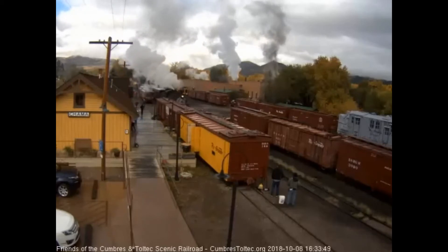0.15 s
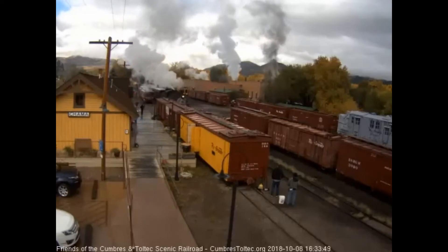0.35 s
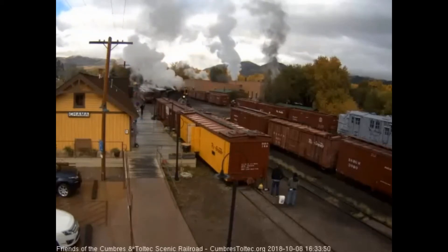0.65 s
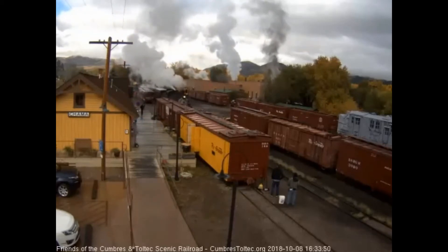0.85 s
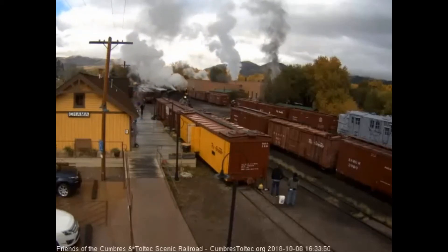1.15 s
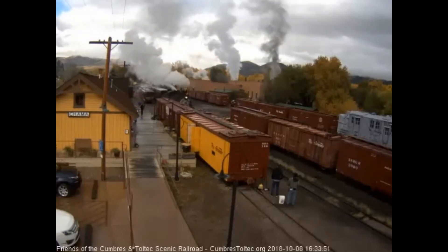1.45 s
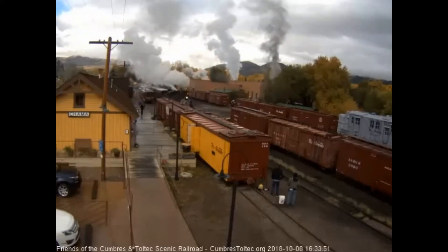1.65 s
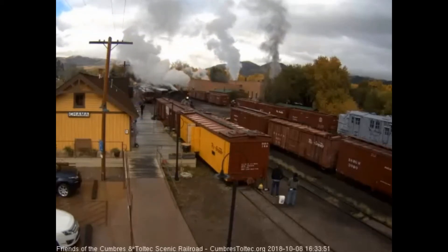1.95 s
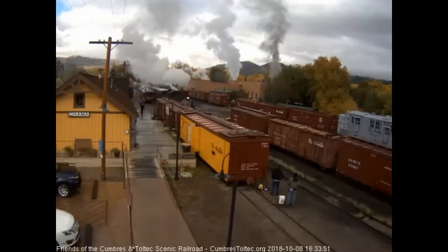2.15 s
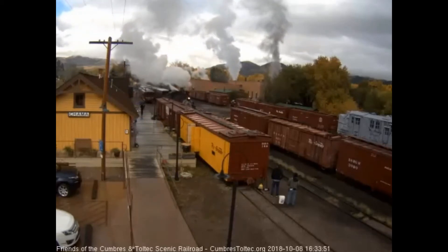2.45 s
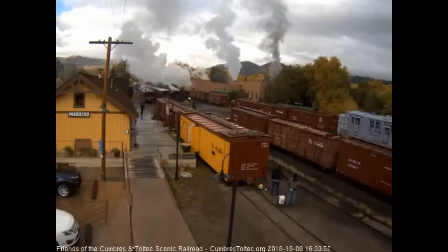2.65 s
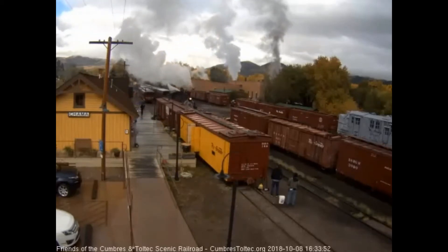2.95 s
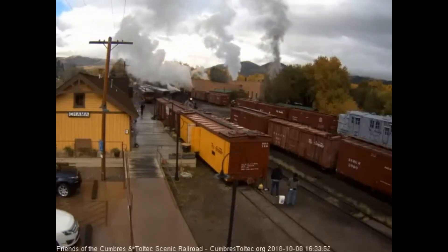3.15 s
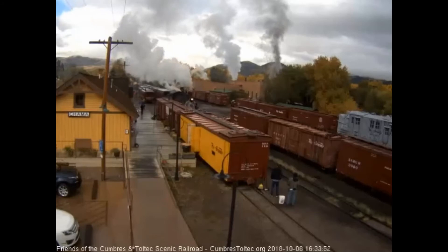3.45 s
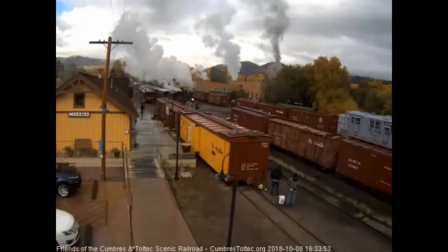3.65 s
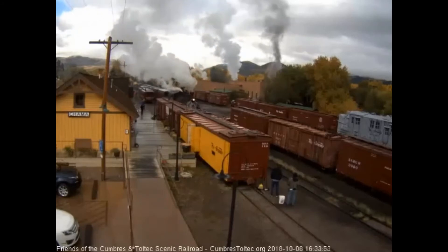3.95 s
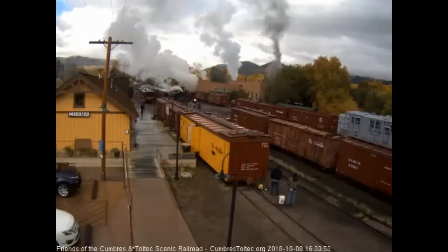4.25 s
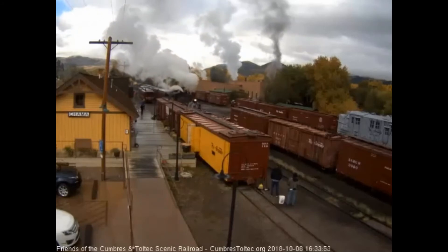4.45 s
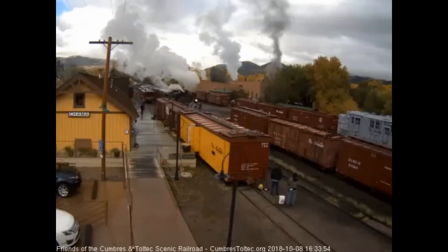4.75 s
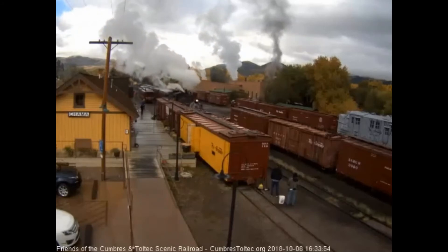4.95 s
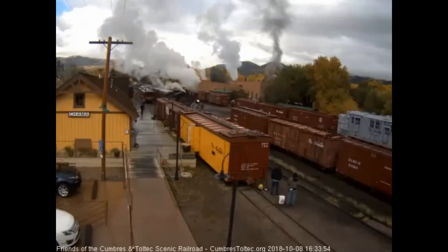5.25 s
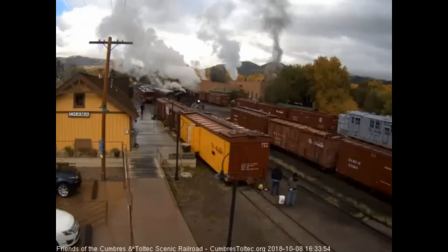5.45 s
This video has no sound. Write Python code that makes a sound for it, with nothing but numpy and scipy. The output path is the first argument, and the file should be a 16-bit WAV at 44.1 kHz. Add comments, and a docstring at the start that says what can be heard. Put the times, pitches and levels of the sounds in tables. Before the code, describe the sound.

Steady venting steam dominates: a dense rushing hiss with a coloured, slightly metallic, resonant edge and little deep bass or airy top. Small surges come early and around three seconds, then the jet weakens. Very quiet low engine tones, a wavering thin whine and soft wind puffs hide underneath. Heard from afar outdoors through a small mono microphone, with faint blurred reflections and slight compression-like flutter.

```python
"""A steam locomotive vents across a rail yard: turbulent jet noise that surges and then eases, coloured
by narrow resonances around a small far-off microphone and finely combed by faint echoes.
A steam-driven generator whines as one wavering sine and an idling engine sounds orders of its crank cycle.
Filtered noise gives the yard murmur, the wind puffs and a low thrum. Both channels carry one microphone.
The outer bands dip briefly now and then, and the top is cut."""
import sys
import numpy as np
from scipy import signal
from scipy.fft import rfft, irfft
from scipy.io import wavfile

SR = 44100
rng = np.random.default_rng(int(sys.argv[2]) if len(sys.argv) > 2 else 0)


def generate_wav(sig):
    """Save sig (samples, or channels by samples) to the path in sys.argv[1] as 16-bit PCM at SR."""
    pcm = np.round(np.clip(np.atleast_2d(sig).T, -1, 1) * 32767).astype(np.int16)
    wavfile.write(sys.argv[1], SR, pcm)


N = 246519
T = np.arange(N) / SR  # time, s
HZ = np.maximum(np.arange(N // 2 + 1) * SR / N, 1)  # spectrum frequencies, Hz


def from_db(db):
    """Logarithmic level: decibels become an amplitude gain."""
    return 10 ** (np.asarray(db) / 20)


def rms_one(x):
    """Power normalisation: scale to rms 1."""
    return x / np.sqrt(np.mean(x ** 2) + 1e-20)


def in_time(rows):
    """Linear interpolation: each column of a time table becomes one value a sample."""
    s, *columns = np.transpose(rows)
    return [np.interp(T, s, column) for column in columns]


def at_hz(points, hz):
    """Logarithmic frequency scale: read a spectrum table with straight lines over log f."""
    table_hz, values = np.transpose(points)
    return np.interp(np.log(hz), np.log(table_hz), values)


def drift(rate_hz):
    """Low-passed random process: white noise through two equal poles at rate_hz, spread 1."""
    step = 40  # samples per slow value
    pole = np.exp(-2 * np.pi * rate_hz * step / SR)
    white = rng.standard_normal(N // step + 2002)
    settled = signal.lfilter([1], [1, -2 * pole, pole * pole], white)[2000:]
    return np.interp(np.arange(N) / step, np.arange(len(settled)), rms_one(settled))


def coloured(level_db):
    """Spectral shaping: white noise weighted by a density in dB per Hz, rms 1."""
    white = rng.standard_normal(N)
    return rms_one(irfft(rfft(white) * from_db(level_db), N))


def by_band(x, gain_db):
    """Filter bank: overlapping half-octave bands that sum to x, each under gain_db(centre Hz)."""
    spectrum = rfft(x)
    place = 2 * np.log2(np.clip(HZ, 30, 7680) / 30)  # half octaves above 30 Hz
    out = 0
    for k in range(17):
        share = np.clip(1 - abs(place - k), 0, 1)
        centre_hz = 30 * 2 ** (k / 2)
        out = out + irfft(spectrum * share, N) * from_db(gain_db(centre_hz))
    return out


# low wavering tone: centre Hz, full width Hz between the -6 dB points, level dB
THRUM_HZ, THRUM_WIDTH_HZ, THRUM_DB = 65.6, 6.6, -79


def low_thrum():
    """Narrow-band noise: a resonance-shaped spectrum makes a tone of wavering level."""
    offset = 2 * (HZ - THRUM_HZ) / THRUM_WIDTH_HZ
    tone = coloured(-20 * np.log10(1 + offset ** 2))
    return from_db(THRUM_DB + 2.1 * drift(2.5)) * tone


# puffs of wind on the microphone: [t/s, peak level/dB]
WIND_PUFFS = [(0.359, -82), (0.72, -72.5), (1.08, -77.5), (1.4, -72.5), (1.8, -75), (2.14, -73),
              (2.999, -70), (3.5, -78.5), (5.55, -77)]
PUFF_S, CALM_DB = .2, -84  # puff width at 1/e of its peak; steady level beneath the puffs


def wind_rumble():
    """Amplitude modulation: deep band-limited noise swells in bell-shaped puffs."""
    puffs = from_db(CALM_DB) + sum(from_db(db) * np.exp(-4 * ((T - s) / PUFF_S) ** 2) for s, db in WIND_PUFFS)
    fall_db = -20 * np.log10(1 + (HZ / 38) ** 4)
    deep_cut_db = -20 * np.log10(1 + (14 / HZ) ** 2)
    lumps = from_db(2.5 * drift(5.0))
    return puffs * lumps * coloured(fall_db + deep_cut_db)


# relative spectrum of the murmur: [f/Hz, level/dB per Hz]
YARD_SPECTRUM = [(15, -0.5), (35, -6.5), (60, 1), (100, -13), (150, -4.5), (330, -3.5), (370, -6),
                 (520, -7.5), (600, -5), (730, -1), (800, -9), (1100, -40.5)]
YARD_DB, YARD_FOLLOWS = -67.5, 0.27  # mean level; share of the jet's swing, as its far rumble adds in


def yard_murmur():
    """Incoherent summation: many far sources merge into noise that partly follows the jet."""
    jet_db = in_time(JET_COURSE)[0]
    level_db = YARD_DB + YARD_FOLLOWS * (jet_db - jet_db.mean()) + .8 * drift(6.6)
    return from_db(level_db) * coloured(at_hz(YARD_SPECTRUM, HZ))


# strongest engine orders: [t/s, 6th order level/dB, 9th order level/dB]
STRONG_ORDERS = [(0.0, -79, -84), (0.5, -85, -86), (1.05, -83, -86), (1.42, -72, -85), (1.8, -76.5, -80),
                 (2.4, -77, -88), (2.9, -77, -79), (3.1, -72, -81), (3.6, -75.5, -79), (4.0, -74, -74.5),
                 (4.5, -76, -74.5), (4.9, -76, -76.5), (5.2, -80, -80), (5.59, -79, -78)]
# weak engine orders, of constant mean level: [order, level/dB]
FAINT_ORDERS = [(3, -88), (4, -93), (5, -88), (10, -87), (11, -86), (12, -88)]
CYCLE_HZ = 28.38  # first order


def engine():
    """Harmonic series: sine orders share the phase of one slightly uneven crank cycle."""
    cycle = 2 * np.pi * np.cumsum(CYCLE_HZ + .06 * drift(1.2)) / SR
    sixth_db, ninth_db = in_time(STRONG_ORDERS)
    out = 0
    for order, db in [(6, sixth_db), (9, ninth_db)] + FAINT_ORDERS:
        level = np.sqrt(2) * from_db(db + 2.6 * drift(10.0))  # sqrt(2): rms to peak
        out = out + level * np.sin(order * cycle + rng.uniform(0, 2 * np.pi))
    return out


# course of the generator's whine: [t/s, level/dB]
WHINE_COURSE = [(0.0, -71), (0.4, -77), (0.75, -72), (1.05, -71), (1.3, -80), (1.8, -75), (2.0, -76),
                (2.2, -70), (2.5, -82), (3.2, -81), (3.35, -74), (3.9, -75), (4.4, -72.5), (4.75, -67),
                (5.0, -72.5), (5.2, -84), (5.45, -75), (5.59, -72)]
WHINE_HZ = 700  # mean pitch


def generator():
    """Random modulation: moving air makes a thin sine flicker; its pitch wavers a little."""
    phase = 2 * np.pi * np.cumsum(WHINE_HZ + 1.2 * drift(3.0)) / SR
    level_db = in_time(WHINE_COURSE)[0] + 2.0 * drift(9.0)
    return np.sqrt(2) * from_db(level_db) * np.sin(phase)


# extra delay range s, level of each echo dB, rate of coming and going Hz
ECHO_FROM_S, ECHO_TO_S, ECHO_DB, ECHO_DRIFT_HZ = .008, .03, -29, .6


def echoes(direct, count=5):
    """Comb interference: late roof and wagon echoes; moving air makes each group come and go."""
    coarse_hz = np.arange(0, 8000, 3.)
    out = 0
    for _ in range(count):
        lags = rng.uniform(ECHO_FROM_S, ECHO_TO_S, 8)
        signs = rng.choice([-1, 1], 8)
        comb = from_db(ECHO_DB) * np.exp(-2j * np.pi * coarse_hz[:, None] * lags) @ signs
        group = irfft(rfft(direct) * np.interp(HZ, coarse_hz, comb), N)
        out = out + drift(ECHO_DRIFT_HZ) * group
    return rms_one(direct + out)


# course of the steam jet: [t/s, level/dB, brightness/dB per octave]
JET_COURSE = [(0.0, -34, 0), (0.6, -32.5, 1.6), (0.95, -31.5, 1), (1.3, -29.5, .8), (1.64, -32.5, 1.1),
              (1.98, -31, 0.5), (2.5, -33, 0.4), (2.8, -32.5, 0.6), (3.1, -30.5, 0.8), (3.2, -32, 1),
              (3.35, -32.5, 0.5), (3.59, -35.5, 0.5), (3.8, -34, 0.1), (4.31, -38, 0.4), (4.61, -36.5, 3),
              (4.95, -37.5, .5), (5.2, -40, 0.5), (5.38, -39.5, 0.5), (5.5, -37.5, 1.5), (5.59, -36.5, 2.5)]
# broad relative colour of the hiss: [f/Hz, level/dB per Hz]
HISS_SPECTRUM = [(500, -51), (800, -37), (1000, -20), (1400, -27), (2100, -10), (2300, -10), (3000, -7),
                 (3650, -14), (3900, -15), (4400, -22), (5000, -34), (5100, -37), (6500, -47), (7000, -55)]
# resonances (+) and cancellations (-) around the microphone: [f/Hz, width/Hz, level/dB]
HOUSING_MODES = [(878, 40, 4.5), (1017, 150, -8.5), (1042, 34, 7.5), (1074, 20, -4.5), (1102, 29, 5.0),
                 (1144, 16, -5.0), (1186, 60, 8.5), (1273, 20, 6.0), (1339, 14, 4.0), (1522, 140, 8.0),
                 (1556, 18, -5.5), (1596, 45, 9), (1636, 14, -2.5), (1671, 54, 7.5), (1734, 199, -3.5),
                 (1822, 22, 4.0), (1879, 30, 4.5), (1935, 21, -3.0), (1951, 35, 2.5), (2009, 42, -3.0),
                 (2080, 23, -5.0), (2142, 111, -8.5), (2243, 169, 6.0), (2313, 41, -5.5), (2348, 31, 5.5),
                 (2384, 24, -4.5), (2443, 47, 11), (2528, 28, 7.0), (2594, 70, 8.5), (2667, 21, -4.0),
                 (2757, 104, -7.0), (2770, 21, 7.5), (2817, 19, 5.0), (2904, 200, 7.0), (2974, 23, -5.5),
                 (3066, 31, -4.5), (3159, 40, -5.0), (3197, 43, 8.0), (3264, 16, 4.0), (3335, 28, 6.0),
                 (3350, 77, -4.0), (3415, 44, 4.5), (3465, 28, -5.5), (3565, 37, -7.5), (3591, 200, 11.5),
                 (3637, 18, -5.0), (3723, 74, -4.0), (3785, 19, 1.5), (3858, 82, -5.0), (4052, 122, -3.5),
                 (4128, 16, 4.5), (4556, 200, -5.0)]
HISS_CENTRE_HZ = 2800  # pivot of the brightness
# flanks swing less than the centre: dB per octave away at mean level, and its change per dB of level
BREADTH_DB, BREADTH_FOLLOWS = 1.2, -0.39


def steam():
    """Turbulent jet noise: resonance-coloured hiss whose bands swell and fade in the moving air."""
    level_db, tilt_db = in_time(JET_COURSE)
    breadth_db = BREADTH_DB + BREADTH_FOLLOWS * (level_db - level_db.mean())
    modes_db = sum(db / (1 + (2 * (HZ - hz) / width) ** 2) for hz, width, db in HOUSING_MODES)
    jet = echoes(coloured(at_hz(HISS_SPECTRUM, HZ) + modes_db))
    together = drift(0.61)  # shared by the bands

    def band_db(hz):
        """Spectral balance: tilt and breadth about the hiss centre, plus random fading."""
        octaves = np.log2(hz / HISS_CENTRE_HZ)
        shape_db = tilt_db * octaves + breadth_db * abs(octaves)
        fading_db = .15 * together + .3 * drift(2.5) + .5 * (hz < 2000) * drift(4.0) + .3 * drift(6.0)
        return (hz > 300) * (shape_db + fading_db)

    return from_db(level_db) * by_band(jet, band_db)


def scene():
    """Superposition: pressures add at one microphone, which feeds both channels."""
    background = yard_murmur() + wind_rumble() + low_thrum()
    return np.tile(steam() + generator() + engine() + background, (2, 1))


# brief dips at set times: [t/s, length/s, level/dB before the band share]
SET_DIPS = [(0.273, 0.018, -7), (0.576, 0.021, -8), (0.616, 0.013, -7), (1.004, 0.052, -4),
            (1.24, 0.022, -8), (1.535, 0.025, -9), (1.579, 0.022, -7), (2.005, 0.022, -6),
            (2.262, 0.057, -9), (2.541, 0.019, -6), (2.749, 0.019, -7), (3.181, 0.018, -7),
            (3.236, 0.038, -9), (3.858, 0.025, -6), (4.041, 0.018, -7), (4.992, 0.022, -10),
            (5.34, 0.025, -7)]
# how far each band follows a dip: [f/Hz, share of its dB]
BAND_SHARE = [(30, 1.3), (300, 1.2), (600, .9), (1000, .6), (1500, .15), (3500, .05), (4500, .6),
              (6500, 1.4)]
# further brief dips at random times: count, length s, mean dB before the band share
RANDOM_DIPS, RANDOM_DIP_S, RANDOM_DIP_DB = 11, .021, -5
CUTOFF_HZ = 7200


def record(dry):
    """Time-varying filtering: bass and treble dip briefly together, then a steep low-pass cuts the top."""
    further = [(when * N / SR, RANDOM_DIP_S, RANDOM_DIP_DB * (.75 + .5 * depth))
               for when, depth in rng.random((RANDOM_DIPS, 2))]
    dips_db = sum(db * np.exp(-4 * ((T - s) / length) ** 2) for s, length, db in SET_DIPS + further)
    mono = by_band(dry[0], lambda hz: at_hz(BAND_SHARE, hz) * dips_db)
    low_pass = signal.ellip(12, .5, 60, CUTOFF_HZ, fs=SR, output="sos")  # ripple dB, stop-band dB
    return np.tile(signal.sosfilt(low_pass, mono), (2, 1))


dry = scene()
out = record(dry)
generate_wav(out)
```